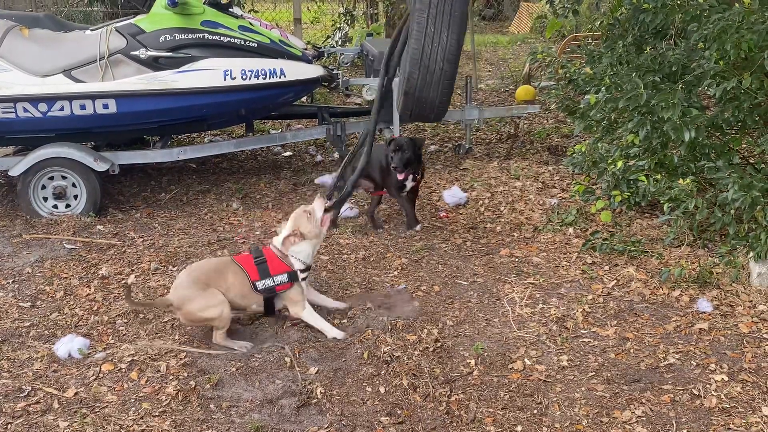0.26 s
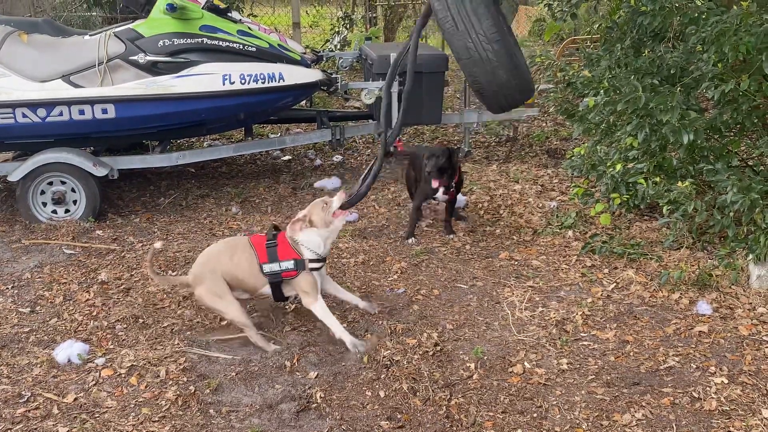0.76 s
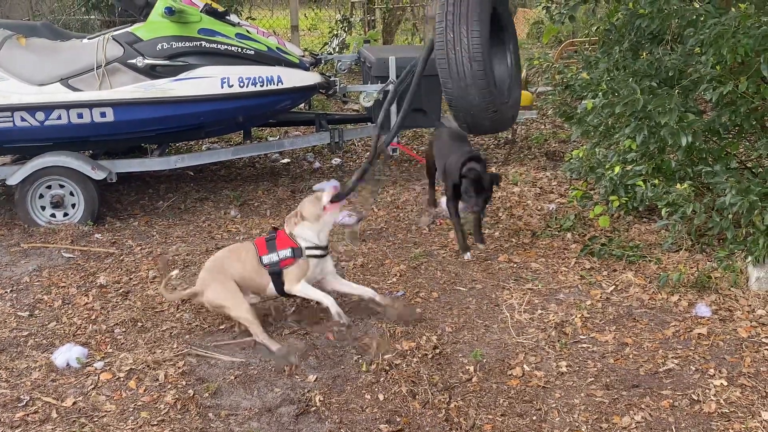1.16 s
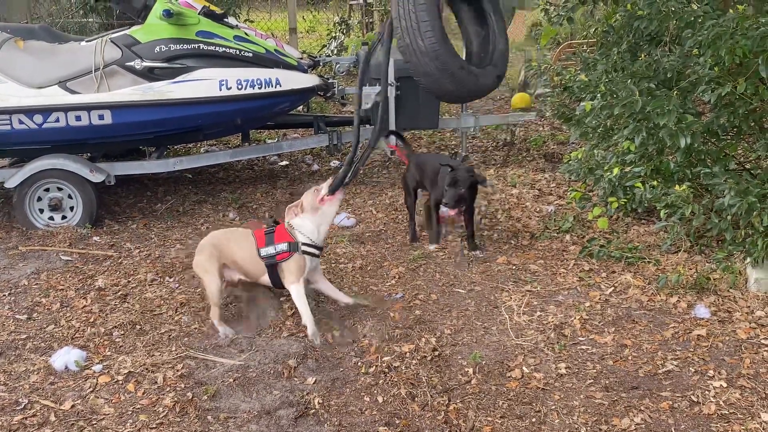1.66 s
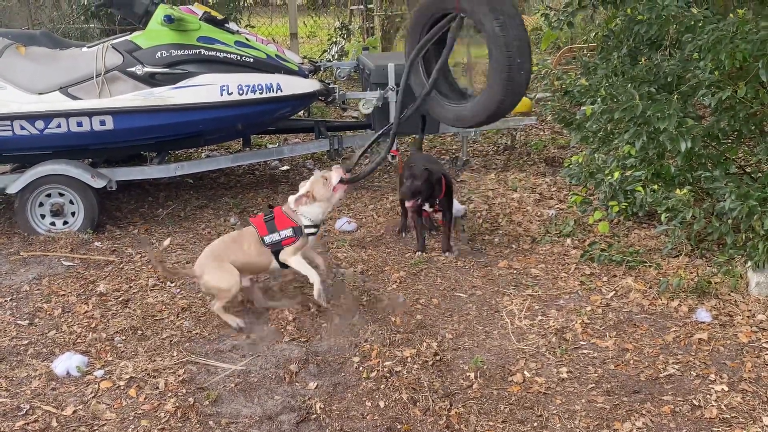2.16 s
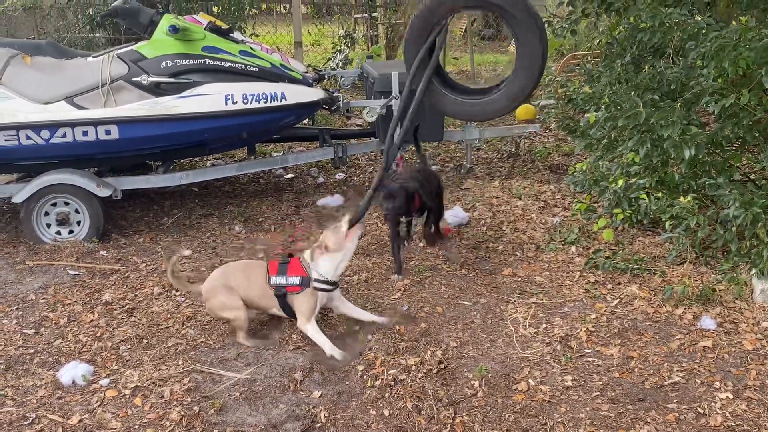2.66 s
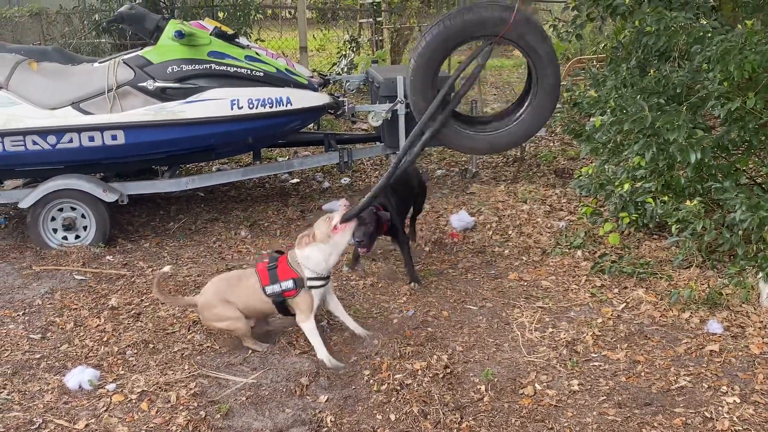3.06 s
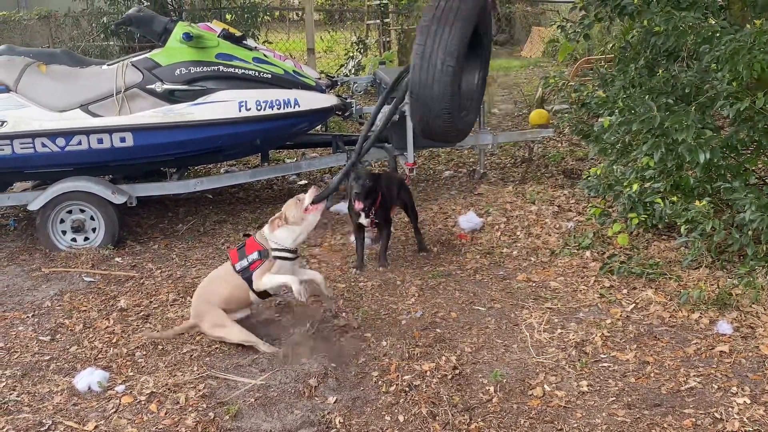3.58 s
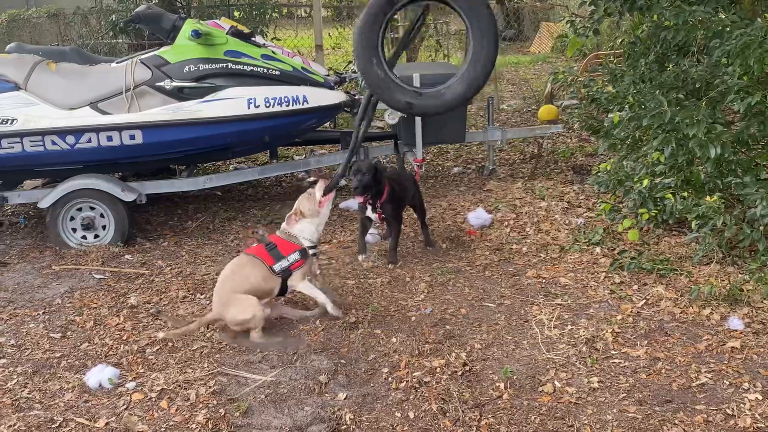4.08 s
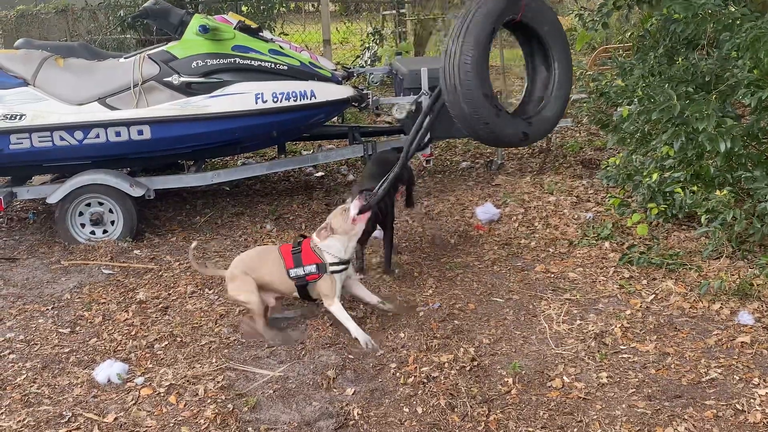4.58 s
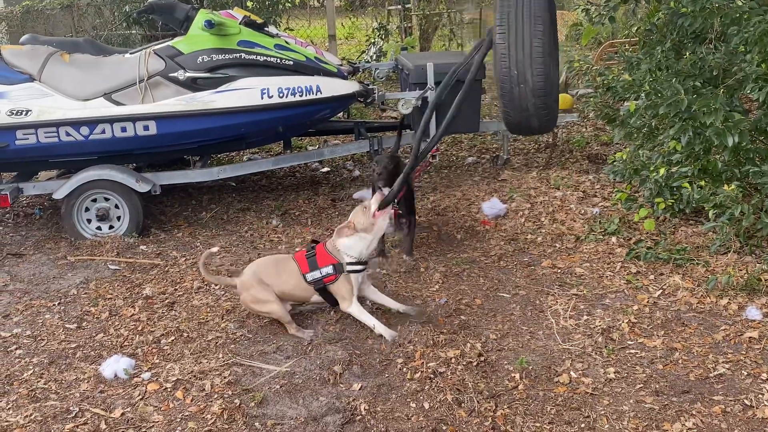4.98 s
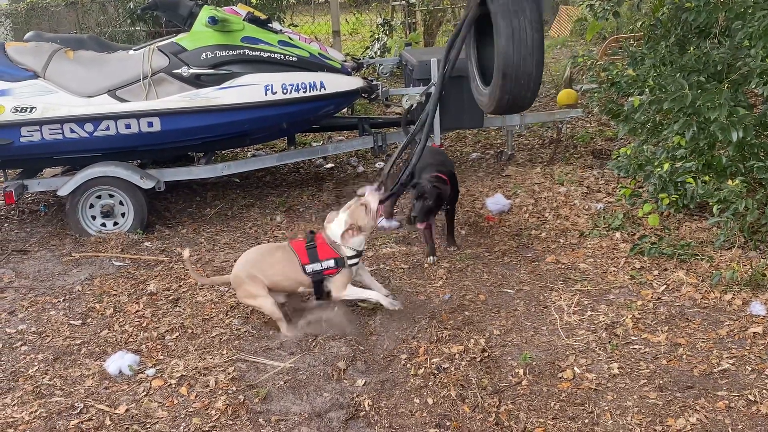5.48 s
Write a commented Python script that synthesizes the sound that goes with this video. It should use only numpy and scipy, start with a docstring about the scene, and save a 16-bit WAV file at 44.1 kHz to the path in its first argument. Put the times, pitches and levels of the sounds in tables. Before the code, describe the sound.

A dog growls through clenched jaws while tugging on a rope in a yard. A soft snort and clipped snarls open the first half second, with a small rope click near 0.5. A long rattling growl runs from 0.6 to 1.6, swelling hardest around 1.45. After a faint snarl, a weaker, more broken growl lasts from 1.9 to 2.9, followed by a rough low snarl. The third, 3.1 to 4.0, is strong and throaty, ending in a snort. Quick snarls lead to the harshest growl, 4.3 to 5.2, with peaks near 4.6 and 5.05, rasp and hiss through the teeth, and sharper rope snaps at 4.6 and 5.15. A snort at 5.25, then a lull, then last short snarls and a puff after 5.55. Faint high metal tinkles come at 0.6, 1.9, 2.7, 3.65 and 5.7. Low outdoor rumble and fluctuating leafy hiss continue throughout, with very short echo.

```python
"""A dog growls through its clenched jaws while it tugs at a rope tied to a hanging tyre in a leafy yard.
Its throat makes long, rattling growls, mixed with short snarls: noisy slaps and puffs ring throat and mouth.
Air bursts ring the nose as snorts, short noise clicks are rope snaps, and high fading tones are harness metal.
Behind the dog, shaped noise makes a low outdoor rumble and a fine hiss with a faint crackle."""
import sys
import numpy as np
from scipy import signal
from scipy.fft import rfft, irfft
from scipy.io import wavfile
from scipy.ndimage import uniform_filter1d

SR = 44100
rng = np.random.default_rng(int(sys.argv[2]) if len(sys.argv) > 2 else 0)


def generate_wav(signal):
    """Clip the signal to [-1, 1] and save it as 16-bit WAV at the path in sys.argv[1]."""
    frames = np.transpose(np.atleast_2d(signal))
    scaled = np.clip(frames, -1, 1) * 32767
    pcm = np.round(scaled).astype(np.int16)
    wavfile.write(sys.argv[1], SR, pcm)


N = 252693
TIME = np.arange(N) / SR  # seconds
FREQS = np.fft.rfftfreq(N, 1 / SR)  # Hz


def gain_of(db):
    """Turns decibels into an amplitude factor."""
    return 10 ** (np.asarray(db) / 20)


def evened(x):
    """Scales a sound to an average strength (rms) of 1."""
    return x / np.sqrt(np.mean(x ** 2) + 1e-20)


def steadied(x, span_s):
    """Holds the strength (rms) near 1 over the span, keeping faster throbs."""
    size = max(int(span_s * SR), 2)
    power = uniform_filter1d(uniform_filter1d(x ** 2, size), size)
    return x / np.sqrt(abs(power) + 1e-9)


def read(points):
    """Reads a table over frequency, joining its points on a log axis."""
    hz, value = np.transpose(points)
    return np.interp(np.log(FREQS + 1), np.log(hz + 1), value)


def coloured(x, points):
    """Shapes the spectrum of x by a table in dB, then sets its rms to 1."""
    return evened(irfft(rfft(x) * gain_of(read(points)), N))


def wander(rate_hz):
    """A smooth random curve of rms 1 that moves mostly slower than the given rate."""
    noise = rfft(rng.standard_normal(N))
    return evened(irfft(noise / (1 + (FREQS / rate_hz) ** 4), N))


def curve(rows, column):
    """Draws one column of a table over time."""
    rows = np.array(rows)
    return np.interp(TIME, rows[:, 0], rows[:, column])


def loudness(tables, column, fade_s=0.0088):
    """Gain over time from a dB column, silent between the tables."""
    total = 0
    for rows in tables:
        inside_s = np.minimum(TIME - rows[0][0], rows[-1][0] - TIME)
        total = total + gain_of(curve(rows, column)) * np.clip(inside_s / fade_s + .5, 0, 1)
    return total


def envelope(start_s, length_s, attack_s, release_s):
    """Rises around the start, holds, and falls around the end."""
    rise = (TIME - start_s) / attack_s
    fall = (start_s + length_s - TIME) / release_s
    return np.clip(np.minimum(rise, fall) + .5, 0, 1)


def arch(middle_s, length_s):
    """One smooth rise and fall."""
    return np.cos(np.pi * np.clip((TIME - middle_s) / length_s, -.5, .5)) ** 2


def add(mix, start_s, sound):
    """Mixes a sound in at a time."""
    part = mix[max(round(start_s * SR), 0):][:len(sound)]
    part += sound[:len(part)]


def resonate(x, hz, width_hz):
    """A hollow that rings around a moving pitch: shift that pitch to zero, smooth twice, shift back."""
    turn = np.exp(2j * np.pi * np.cumsum(hz * np.ones(len(x))) / SR)
    r = np.exp(-np.pi * width_hz / SR)
    return 2 * (turn * signal.lfilter([(1 - r) ** 2], [1, -2 * r, r * r], x / turn)).real


def cavity(x, modes):
    """Several resonances side by side; each mode is pitch_hz, width_hz of one stage, level_db."""
    return sum(gain_of(db) * resonate(x, hz, width_hz) for hz, width_hz, db in modes)


FLUTTER, FLUTTER_HZ = .035, 30  # typical shift as a share of the pitch, and its rate


def flutter():
    """The factor by which loose flesh shifts a resonance from moment to moment."""
    return 1 + FLUTTER * wander(FLUTTER_HZ)


def folds(pitch_hz, jitter, shimmer_db, rough, puff_share):
    """Vocal folds: uneven slaps, each followed by a puff of turbulent air."""
    turns = np.cumsum(pitch_hz * np.exp(jitter * wander(90))) / SR
    slaps = np.diff(np.floor(turns), prepend=0)
    puffs = np.exp(-(turns % 1) / puff_share) * rng.standard_normal(N)
    rough = np.clip(rough, 0, 1)
    flow = (1 - rough) * evened(slaps) + rough * evened(puffs)
    flow = flow * gain_of(shimmer_db * wander(38))
    # the nose swallows a band below the throat resonance, and a mouth radiates almost no deep bass
    flow = signal.lfilter(*signal.iirnotch(355, 3, fs=SR), flow)
    return signal.sosfilt(signal.butter(4, 90, "highpass", fs=SR, output="sos"), flow)


# how the hiss swells and sinks, before a fixed lift: time_s, level_db
HISS_SWELL = [(0.0, -49.5), (0.33, -53.5), (0.51, -47.5), (0.7, -51), (1.56, -50), (1.98, -53.5),
              (2.87, -48.5), (3.03, -50), (3.29, -57), (3.72, -56), (3.97, -59.5), (4.41, -50), (4.84, -55),
              (5.19, -47.5), (5.6, -52.5), (5.73, -46.5)]
# tone colour of the rumble, relative: pitch_hz, level_db
RUMBLE_COLOUR = [(15, -47), (30, -19), (52, 6.5), (100, 7), (160, -2), (270, -7), (600, -16.5), (1000, -18),
                 (1800, -19)]
# tone colour of the hiss, relative: pitch_hz, level_db
HISS_COLOUR = [(900, 5), (1600, 8), (3000, 3), (4500, 4), (7000, 5.5), (8500, 1), (11000, 4), (14500, -1.5),
               (16000, -8.5)]
# how alike left and right hear the outdoors: pitch_hz, likeness (0 to 1)
LIKENESS = [(60, .995), (200, .98), (640, 0.9), (3100, 1), (15000, 1)]
RUMBLE_DB, HISS_LIFT_DB = -40.5, 9.5
HISS_FLICKER_DB, HISS_FLICKER_HZ = 1.1, 14


def outdoors():
    """Shaped noise: a low rumble, and a flickering hiss with a faint crackle of leaves, nearly alike in both ears."""
    level_db = curve(HISS_SWELL, column=1) + HISS_FLICKER_DB * wander(HISS_FLICKER_HZ)

    def side():
        """The spectrum of one independent rumble and hiss."""
        rumble = coloured(rng.standard_normal(N), RUMBLE_COLOUR)
        rumble = irfft(rfft(rumble) / (1 + (FREQS / 1600) ** 4), N)
        crackle = rng.standard_normal(N) * (rng.random(N) < 350 / SR)
        hiss = coloured(rng.standard_normal(N) + 0.09 * evened(crackle), HISS_COLOUR)
        return rfft(gain_of(RUMBLE_DB) * evened(rumble) + gain_of(level_db + HISS_LIFT_DB) * hiss)

    left, other = side(), side()
    same = np.clip(read(LIKENESS), 0, 1)
    right = same * left + np.sqrt(1 - same ** 2) * other
    return irfft(np.array([left, right]), N)


# snorts: middle_s, length_s, nose_db, nostril_hiss_db
SNORTS = [(0.033, 0.17, -29, -39.5), (4.019, 0.17, -26, -32), (5.245, 0.15, -28.5, -41),
          (5.698, 0.13, -31.5, -40.5)]
# hollow resonances of the nose: pitch_hz, width_hz, level_db (relative)
NOSE_MODES = [(147, 46, 8.5), (493, 330, -1.5), (1420, 490, -4), (1910, 500, -2.5)]
# hissing resonances of the nostrils: pitch_hz, width_hz, level_db (relative)
NOSTRIL_MODES = [(2980, 360, 5.5), (3640, 900, 4), (4700, 860, 2), (6200, 1500, -5), (9900, 1500, -14)]
HISS_LAG_S = 0.0068  # the nostrils hiss just after the nose rings


def snort():
    """Air bursts through the nose: the soft palate flutters into hollow resonances, then the nostrils hiss."""
    palate = folds(120, jitter=.3, shimmer_db=1.5, rough=.8, puff_share=.7)
    nose = sum(gain_of(db) * arch(middle_s, length_s) for middle_s, length_s, db, _ in SNORTS)
    hiss = sum(gain_of(db) * arch(middle_s + HISS_LAG_S, length_s) for middle_s, length_s, _, db in SNORTS)
    hollow = steadied(cavity(palate, NOSE_MODES), .03)
    nostrils = steadied(cavity(palate, NOSTRIL_MODES), .03)
    return nose * hollow + hiss * nostrils


FULL_PUSH_DB = -18  # the effort that counts as a full push
CHEST_SLOPE = 0.6  # dB of chest sound lost per dB of effort below a full push
SNARL_CHEST_DB = -26.5  # chest of a snarl at a full push
SNARL_ATTACK_S, SNARL_RELEASE_S = .006, .02
SNARL_SHIMMER_DB, SNARL_ROUGH_SHIMMER_DB = .8, 2.5  # unevenness of a clean snarl, and what roughness adds
SNARL_PITCH_PER_DB = .018  # share of the pitch lost per dB of sag
MOUTH_WIDTH_HZ = 235
# snarls: start_s, length_s, effort_db, crest_place (0 to 1), end_sag_db, teeth_db (relative to effort),
# pitch_hz (before bends), roughness (0 to 1), low_mouth_hz, high_mouth_hz, high_mouth_db (relative to low)
SNARLS = [(0.112, 0.042, -27.5, 0.25, 9, -7.5, 187, 0.07, 950, 1120, -10),
          (0.15, 0.081, -41.5, 0.66, 2, 0.5, 179.1, 0.43, 960, 1160, 3),
          (0.425, 0.2, -33.5, 0.25, 3.5, -15, 121.8, 0.66, 877, 1210, -1.5),
          (1.033, 0.081, -25.5, 0.12, 7.5, -5.5, 151.5, 0.46, 901, 1100, -6.5),
          (1.783, 0.14, -40, 0.02, 5.5, -18, 111.2, 0.35, 880, 1097, -2),
          (2.418, 0.098, -31.5, 0.21, 11.5, -22, 134, 0.58, 905, 1090, -6),
          (2.661, 0.069, -27, 0.43, 9.5, -8, 140.1, 0.54, 890, 1110, -6),
          (2.919, 0.28, -31.5, 0.51, 7, -7.5, 140.5, 0.9, 730, 1165, -0.5),
          (3.562, 0.11, -38, 0.74, 3.5, -19.5, 139.3, 0.71, 901, 1103, 4),
          (3.895, 0.085, -33, 0.27, 5.5, -9, 145.1, 0.6, 961, 1110, 0),
          (4.139, 0.06, -33, 0.69, 4, -7.5, 140, 0.26, 924, 1030, -11),
          (4.198, 0.05, -28.5, 1, 4.5, -5.5, 140.6, 0.4, 863, 1000, -19),
          (4.246, 0.11, -25, 0.05, 7.5, -16, 145.2, 0.58, 820, 1000, -2),
          (5.567, 0.0548, -36, 0.33, 7, -5.5, 144.7, 0.15, 745, 1200, 6),
          (5.635, 0.1, -26, 0.58, 11.5, -12, 135.4, 0.53, 901, 1123, -4)]


def snarl():
    """Folds slap into a wider mouth; each snarl swells and sags, and the mouth glides from shape to shape."""
    effort, bend = np.zeros(N), np.ones(N)
    for start_s, length_s, db, crest, end_sag_db, *_ in SNARLS:
        crest = np.clip(crest, .01, .99)
        sag_db = np.interp((TIME - start_s) / length_s, [0, crest, 1], [end_sag_db, 0, end_sag_db])
        sounding = envelope(start_s, length_s, SNARL_ATTACK_S, SNARL_RELEASE_S)
        effort += gain_of(db - sag_db) * sounding
        bend -= SNARL_PITCH_PER_DB * (sag_db - end_sag_db / 2) * sounding

    start_s, length_s, _, _, _, *shapes = np.transpose(SNARLS)
    middle_s = start_s + length_s / 2
    teeth_db, pitch_hz, rough, low_hz, high_hz, high_db = (np.interp(TIME, middle_s, shape) for shape in shapes)
    shimmer_db = SNARL_SHIMMER_DB + SNARL_ROUGH_SHIMMER_DB * rough
    drive = folds(pitch_hz * bend, jitter=.42 * rough, shimmer_db=shimmer_db, rough=rough / 2, puff_share=.4)

    mouth = resonate(drive, low_hz * flutter(), MOUTH_WIDTH_HZ)
    mouth += gain_of(high_db) * resonate(drive, high_hz * flutter(), MOUTH_WIDTH_HZ)
    teeth = cavity(drive, [(1828, 290, 7), (2060, 260, 4)])
    # the lower the mouth resonance sinks, the more the back of the throat rings
    body = resonate(drive, 167, 136)
    body += gain_of(-4) * (850 / low_hz) ** 4 * resonate(drive, 456, 136)
    chest = gain_of(SNARL_CHEST_DB) * (effort / gain_of(FULL_PUSH_DB)) ** CHEST_SLOPE
    # the teeth are mixed in upside down against the mouth
    head = gain_of(1.0) * steadied(mouth, .04) - gain_of(teeth_db) * steadied(teeth, 0.025)
    return effort * head + chest * steadied(body, 0.028)


# snaps of the rope between the teeth: start_s, level_db (before a fixed 3 dB cut)
SNAPS = [(0.4685, -16), (2.4059, -19), (4.2807, -14), (4.6049, -8), (5.1589, -8), (5.6963, -16)]


def rope():
    """The rope slips in the teeth: a short click of noise rings the mouth."""
    out, t = np.zeros(N), np.arange(SR // 20) / SR
    for start_s, db in SNAPS:
        click = np.exp(-t / 0.001) * rng.standard_normal(len(t))
        snap = cavity(click, [(1110, 1200, 7), (1800, 290, 9.1)])
        add(out, start_s, gain_of(db - 3) * snap / abs(snap).max())
    return out


THROB_HZ, THROB_PUSH_HZ = 20, 26  # rate of the rattle at rest, and what a full push adds
THROB_DB, THROB_PUSH_DB = 5.8, 3.4  # swing each way at rest, and what a full push takes off


def throbbing(push):
    """Gain of a slow rattle, quietest as each growl starts, then quicker and shallower as the push grows."""
    rate_hz = (THROB_HZ + THROB_PUSH_HZ * push) * np.exp(.42 * wander(25))
    turns = np.cumsum(rate_hz) / SR
    starts_s = [rows[0][0] for rows in GROWLS]
    # count the turns afresh from each growl
    turns -= np.interp(starts_s, TIME, turns)[np.searchsorted(starts_s, TIME) - 1]
    return gain_of(-(THROB_DB - THROB_PUSH_DB * push) * np.cos(2 * np.pi * turns))


# hard tugs that bare the teeth: middle_s, length_s, rasp_db, lip_hz, lower_throat_db, whistle_db, tooth_gap_hz
# (lip_hz and tooth_gap_hz are the pitches near the middle of the tug)
TUGS = [(0.692, 0.13, -25.5, 1814, -55, -63, 2870), (1.096, 0.26, -31, 1845, -31.5, -42.5, 3100),
        (1.451, 0.43, -39, 1784, -30.5, -47, 2650), (1.98, 0.14, -30.5, 1830, -68, -71, 2922),
        (2.326, 0.15, -34.5, 1830, -34, -43.5, 3300), (2.727, 0.14, -47.5, 1884, -30, -39, 3265),
        (3.34, 0.57, -53, 1580, -67, -59.5, 4860), (3.756, 0.28, -38.5, 2004, -31, -44, 2800),
        (4.288, 0.14, -31, 1850, -38.5, -46, 3503), (4.605, 0.073, -27.5, 1500, -26.5, -41, 3260),
        (4.658, 0.13, -27, 1990, -54, -48.5, 3250), (4.877, 0.14, -29.5, 1570, -63, -64, 2920),
        (5.048, 0.15, -25.5, 1650, -22.5, -40, 3260), (5.133, 0.17, -29.5, 2120, -32, -45, 3320)]
LIP_WIDTH_HZ, LIP_RISE_PER_S = 400, 1  # the lip pitch climbs at this rate as the lips draw back
GAP_RISE_PER_S = .7  # the gap's pitches climb at this rate as the jaws clamp down
GAP_OVERTONE, GAP_OVERTONE_DB = 1.4, -6  # second resonance of the gap, as a multiple of the first
WHISTLE_LAG_S = 0.015


def bared_teeth(drive):
    """At each tug the lips rasp, and air forced between teeth and rope rings two resonances of the gap."""
    out = np.zeros(N)
    for middle_s, length_s, rasp_db, lip_hz, _, whistle_db, gap_hz in TUGS:
        span = slice(int((middle_s - length_s) * SR), int((middle_s + length_s) * SR))
        since_s = TIME[span] - middle_s
        lips = resonate(drive[span], lip_hz * np.exp(LIP_RISE_PER_S * since_s), LIP_WIDTH_HZ)
        whistle_hz = gap_hz * np.exp(GAP_RISE_PER_S * (since_s - WHISTLE_LAG_S))
        gap = cavity(drive[span], [(whistle_hz, .08 * gap_hz, 0),
                                   (whistle_hz * GAP_OVERTONE, .13 * gap_hz, GAP_OVERTONE_DB)])
        rasp_gain = gain_of(rasp_db) * arch(middle_s, length_s)[span]
        whistle_gain = gain_of(whistle_db) * arch(middle_s + WHISTLE_LAG_S, length_s)[span]
        out[span] += rasp_gain * steadied(lips, 0.043)
        out[span] += whistle_gain * steadied(gap, 0.31)
    return out


# heaves, where the throat catches and bursts open with a clear ring: middle_s, crest_rms_db, ring_hz (before wobble)
HEAVES = [(0.715, -18, 688), (0.839, -24, 698), (1.066, -16, 660), (1.155, -18, 677), (1.362, -19, 697),
          (1.387, -17, 701), (1.453, -12, 690), (1.512, -16, 623), (1.966, -22, 537), (2.324, -17, 719),
          (2.379, -20, 659), (2.595, -20, 711), (2.671, -19, 699), (2.708, -17, 680), (2.779, -17, 710),
          (3.165, -13, 624), (3.191, -16, 654), (3.257, -14, 714), (3.291, -15, 711), (3.412, -15, 689),
          (3.437, -16, 696), (3.708, -13, 679), (3.844, -18, 698), (3.984, -21, 691), (4.56, -16, 700),
          (4.573, -13, 702), (4.591, -10, 699), (4.629, -11, 726), (4.909, -16, 664), (5.013, -17, 696),
          (5.059, -11, 689)]
HEAVE_S, CATCH_S = .02, .036  # length of a heave, and of the catch in the rattle around it
CATCH_DEPTH = .68  # share of the rattle that a catch shuts off
HEAVE_JITTER, HEAVE_JITTER_HZ = .065, 170  # typical wobble of the ring as a share, and its rate


def heaves():
    """The wobbling rings of the heaves, and the gain of the rattle that catches around them."""
    ring, catch = np.zeros(N), np.zeros(N)
    swell = np.hanning(int(HEAVE_S * SR))
    wobble = 1 + HEAVE_JITTER * wander(HEAVE_JITTER_HZ)
    for middle_s, db, hz in HEAVES:
        turns = np.cumsum(hz * wobble[int(middle_s * SR):][:len(swell)]) / SR
        tone = np.sqrt(2) * np.sin(2 * np.pi * turns)  # rms 1
        add(ring, middle_s - HEAVE_S / 2, gain_of(db) * swell * tone)
        add(catch, middle_s - CATCH_S / 2, signal.windows.tukey(int(CATCH_S * SR), .5))
    return ring, 1 - CATCH_DEPTH * np.minimum(catch, 1)


# one curve a growl: time_s, effort_db, throat_hz (main throat resonance, before flutter)
GROWLS = [
    [(0.625, -34.5, 664), (0.653, -22.5, 670), (0.721, -23, 693), (0.762, -28, 650), (0.825, -39, 650),
     (0.889, -36, 670), (1.009, -30, 737), (1.057, -23, 669.5), (1.2, -25, 703), (1.29, -25, 635),
     (1.345, -28, 706), (1.441, -18.5, 707), (1.505, -20, 664), (1.553, -21, 623), (1.64, -47, 666)],
    [(1.92, -47, 568), (1.928, -36.5, 545), (1.96, -26, 542), (2.01, -30, 570), (2.08, -39, 676),
     (2.2, -35, 687), (2.33, -22, 732), (2.382, -26, 656), (2.394, -32.5, 671), (2.574, -34.5, 707),
     (2.584, -27, 703), (2.77, -24, 682), (2.838, -31, 726), (2.88, -49.5, 722)],
    [(3.147, -31, 610), (3.157, -22, 628), (3.317, -19, 728), (3.393, -25, 700), (3.415, -20, 695),
     (3.555, -31, 749), (3.7, -18.5, 693), (3.735, -23.5, 601), (3.853, -25, 695), (3.901, -35, 727),
     (3.991, -29, 679), (4.045, -36, 600)],
    [(4.34, -27, 778), (4.434, -28, 675), (4.538, -30, 688), (4.564, -16, 674), (4.624, -15, 717),
     (4.7, -25, 617), (4.78, -29.5, 675), (4.878, -19.5, 675), (4.974, -26, 716), (5.054, -16.5, 696),
     (5.12, -21, 610), (5.178, -28, 710), (5.24, -40, 770)],
]
# rasping resonances, before jaw and flutter shift them: pitch_hz, width_hz, level_db (relative)
RASP_MODES = [(1776, 320, 17), (2005, 188, 11.5)]
# hissing resonances at the teeth: pitch_hz, width_hz, level_db (relative)
SPRAY_MODES = [(2880, 120, 15), (3320, 210, 7.3), (4840, 1300, 11.6), (6900, 760, 9.3), (10323, 1290, 1.5)]
# deep resonances of the chest: pitch_hz, width_hz, level_db (relative)
CHEST_MODES = [(104.5, 46, -4), (134.73, 51, 1), (214.5, 56, 0), (430, 92, -1)]
# drive levels at a full push, before each layer's own trim; the slope is dB lost per dB of effort below it
RASP_DB, RASP_SLOPE, CHEST_DB = -31.5, 0.91, -33.5
THROAT_WIDTH_HZ, LOWER_RING_DB = 130, -12


def growl():
    """Chaotic folds, throbbing with the loose flesh of the throat; pushing harder adds rasp, then spray."""
    effort = loudness(GROWLS, column=1)
    throat_hz = curve(np.concatenate(GROWLS), column=2)
    strain = effort / gain_of(FULL_PUSH_DB)
    push = np.clip(strain, 0, 1)
    hollow = sum(gain_of(db) * arch(middle_s, length_s) for middle_s, length_s, _, _, db, *_ in TUGS)
    rasp = gain_of(RASP_DB) * strain ** RASP_SLOPE
    chest = gain_of(CHEST_DB) * push ** CHEST_SLOPE + gain_of(-12) * hollow

    # two mixes of the same folds: the second has more turbulent air, and only half the throb in dB
    slapping, airy = folds(80 + 50 * push, jitter=.24, shimmer_db=2, rough=[[.28], [.58]], puff_share=.8)
    throb = throbbing(push)
    drive, front = throb * slapping, np.sqrt(throb) * airy

    # the throat rings with a pair of resonances; the lower one swells at the tugs
    upper = resonate(drive, throat_hz * flutter(), THROAT_WIDTH_HZ)
    lower = resonate(drive, throat_hz * 0.824 * flutter(), 76.0)
    # a hard push wakes a third resonance just above them
    upper += gain_of(-14.5) * push * resonate(drive, throat_hz * 1.195 * flutter(), THROAT_WIDTH_HZ)
    ring, catch = heaves()
    throat = steadied(upper + gain_of(LOWER_RING_DB) * lower, 0.014)
    voice = ring + gain_of(1.02) * effort * catch * throat
    voice += hollow * steadied(lower, 0.03)

    # the rasp resonances rise and fall with the throat, and each flutters on its own
    jaw = np.sqrt(throat_hz / 675)
    rasp_modes = [(hz * jaw * flutter(), width_hz, db) for hz, width_hz, db in RASP_MODES]
    voice += gain_of(-0.5) * rasp * steadied(cavity(front, rasp_modes), 0.043)
    voice += gain_of(2.5) * chest * steadied(cavity(drive, CHEST_MODES), 0.01)

    # a hard growl turns harsh between the resonances and hisses through the teeth
    harsh = rasp * push
    voice += gain_of(0.5) * harsh * steadied(resonate(front, 1360 * jaw * flutter(), 260), 0.032)
    tug_rasp = sum(gain_of(db) * arch(middle_s, length_s) for middle_s, length_s, db, *_ in TUGS)
    blast = rasp + gain_of(-4.0) * tug_rasp * push
    spray = gain_of(9.5) * blast * (blast / gain_of(4.0)) ** 0.75
    return voice + spray * steadied(cavity(front, SPRAY_MODES), 0.17) + bared_teeth(front)


# tinkles of the harness metal: start_s, level_db (before the fade), pitch_hz, fade_s (time to fall 60 dB)
TINKLES = [(0.628, -43.5, 14300, 0.066), (1.898, -33, 12150, 0.067), (2.695, -35, 12320, 0.086),
           (3.657, -34.5, 14130, 0.069), (5.676, -28, 12200, 0.085)]


def harness():
    """Small metal parts touch and ring very high: each is one fading tone with a soft start."""
    out, t = np.zeros(N), np.arange(SR // 5) / SR
    for start_s, db, hz, fade_s in TINKLES:
        fade = gain_of(db - 60 * t / fade_s) * (1 - np.exp(-t / 0.002))
        add(out, start_s, fade * np.sin(2 * np.pi * hz * t))
    return out


def yard(x, t60_s, tail_db):
    """Thin, quickly dying scatter from the ground, the trailer and the bushes: random sparse echoes."""
    t = np.arange(SR // 2) / SR
    taps = rng.standard_normal((2, len(t))) * (rng.random((2, len(t))) < 2000 / SR)
    taps = taps * (t > .004) * gain_of(-60 * t / t60_s)
    # long waves pass the clutter by
    taps = signal.sosfilt(signal.butter(2, 450, "highpass", fs=SR, output="sos"), taps)
    taps /= np.linalg.norm(taps, axis=1, keepdims=True)
    return x + gain_of(tail_db) * signal.fftconvolve(x[None], taps, axes=1)[:, :N]


def scene():
    """The dog and its tackle echo in the yard, over the outdoor rumble and hiss."""
    background = outdoors()
    dog = snort() + snarl() + growl()
    tackle = rope() + harness()
    return yard(dog + tackle, t60_s=0.06, tail_db=-11) + background


# level balance of the two microphone ports: pitch_hz, left_minus_right_db
BALANCE = [(60, -1.1), (380, -2.3), (700, -6.9), (1290, -3.3), (2380, -1), (4400, 0)]
# phase between the ports: pitch_hz, left_lead_radians
PORT_PHASE = [(0, 0), (80, -.12), (520, -.2), (780, .1), (2100, .7), (3500, 0), (7500, 0), (9050, -3.1),
              (11000, -6.2), (13100, -9.3), (15000, -12.5)]
EDGE_HZ = 15900  # upper band limit


def record(dry):
    """The two ports differ in level and phase; then peaks are rounded and the top treble is cut."""
    lean = gain_of(read(BALANCE))
    ports = np.array([lean, np.exp(-1j * read(PORT_PHASE))]) * 2 / (1 + lean)
    heard = irfft(rfft(dry) * ports, N)
    # the highest peaks are rounded off just under full scale
    heard = heard / (1 + (heard / .9) ** 8) ** (1 / 8)
    low_pass = signal.firwin(511, EDGE_HZ, window=("kaiser", 9), fs=SR)
    return signal.oaconvolve(heard, low_pass[None], "same")


dry = scene()
out = record(dry)
generate_wav(out)
```